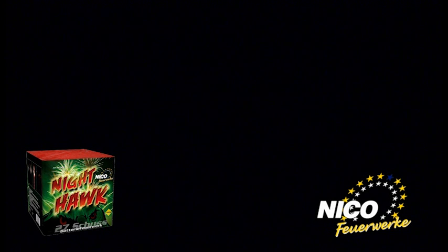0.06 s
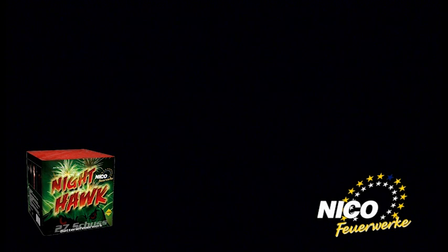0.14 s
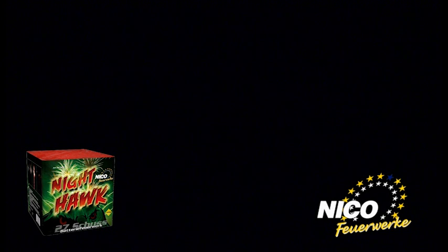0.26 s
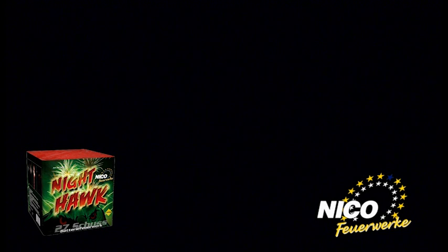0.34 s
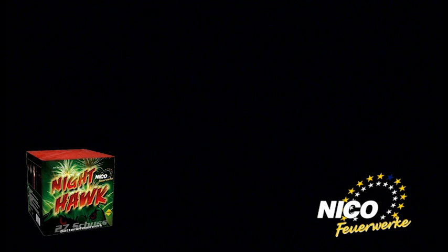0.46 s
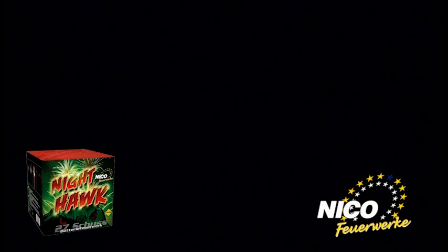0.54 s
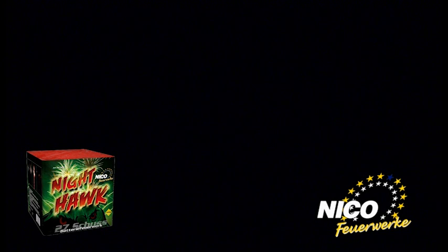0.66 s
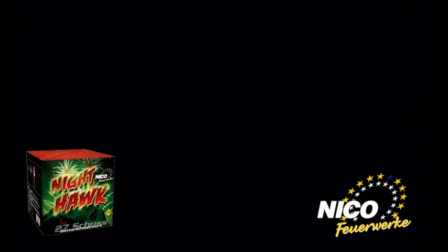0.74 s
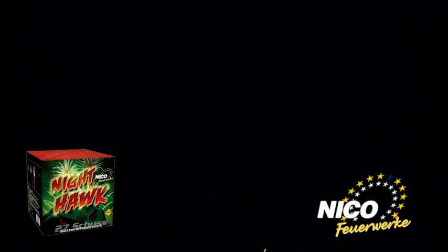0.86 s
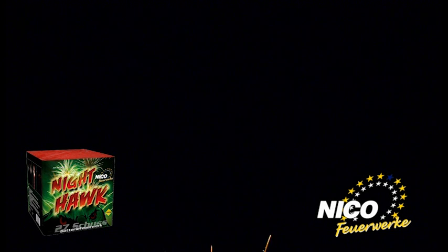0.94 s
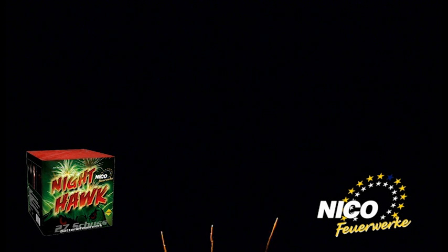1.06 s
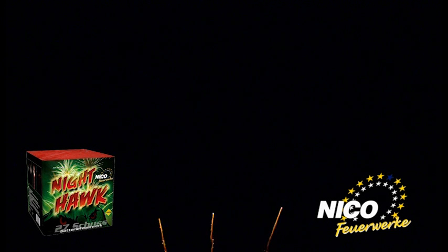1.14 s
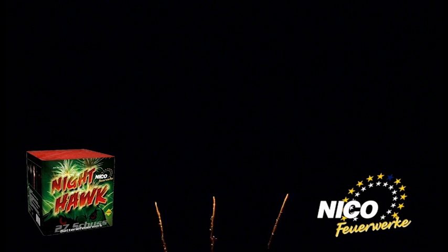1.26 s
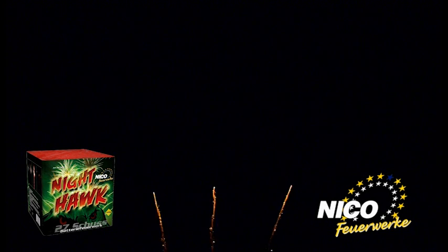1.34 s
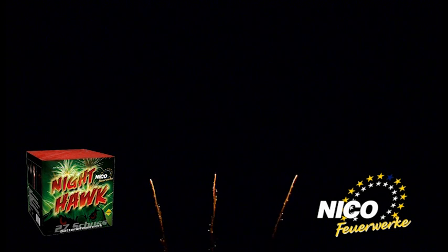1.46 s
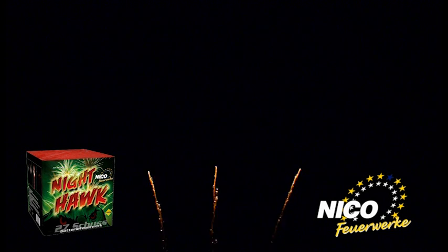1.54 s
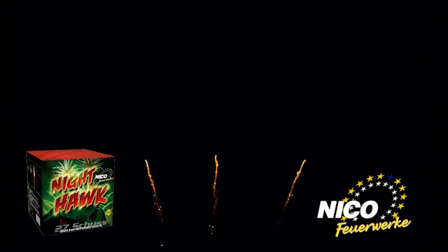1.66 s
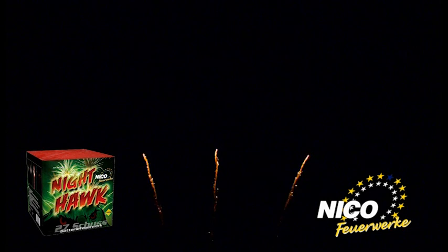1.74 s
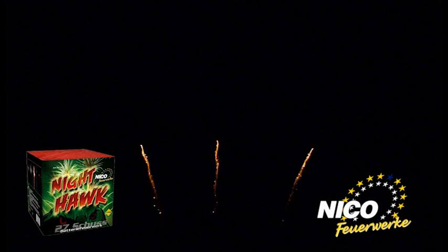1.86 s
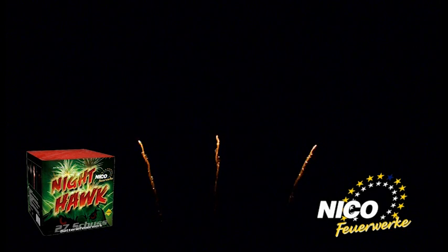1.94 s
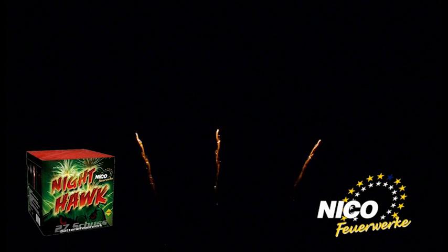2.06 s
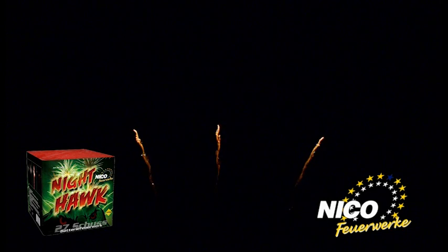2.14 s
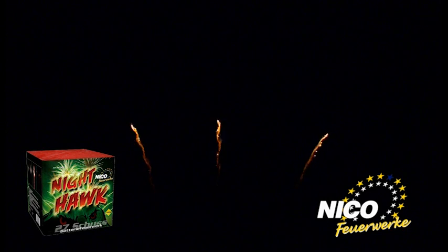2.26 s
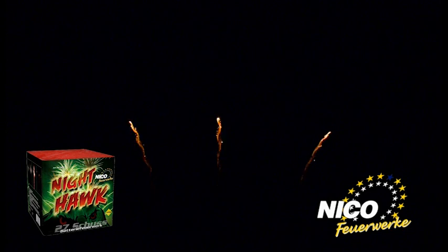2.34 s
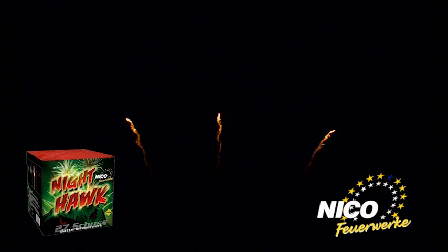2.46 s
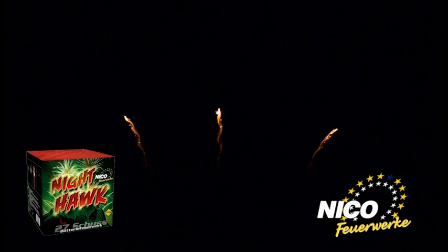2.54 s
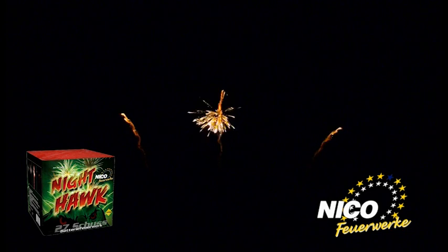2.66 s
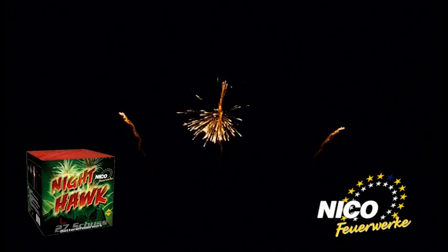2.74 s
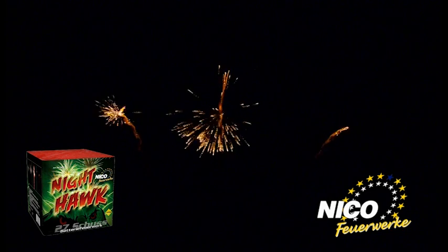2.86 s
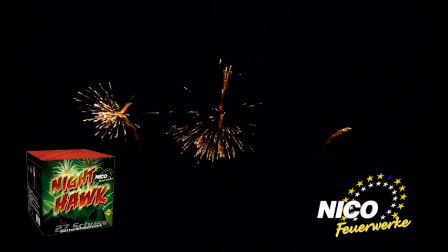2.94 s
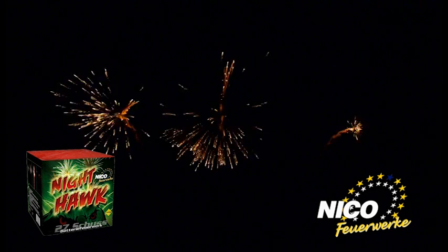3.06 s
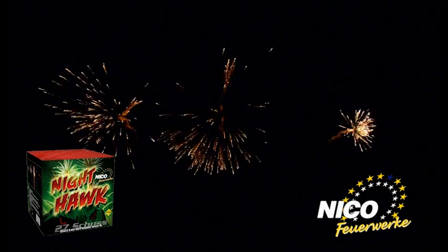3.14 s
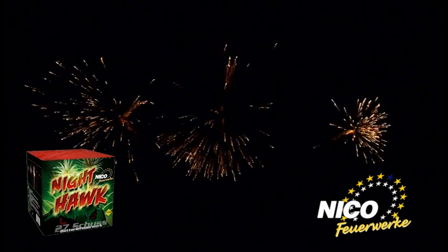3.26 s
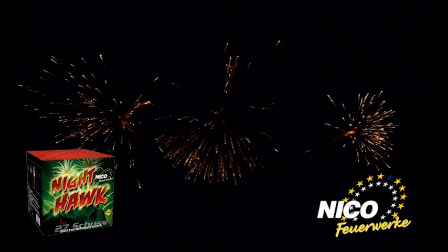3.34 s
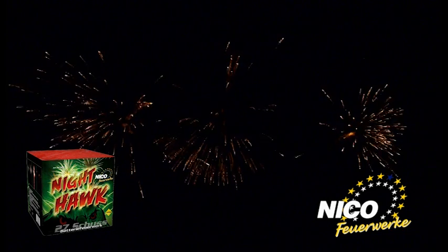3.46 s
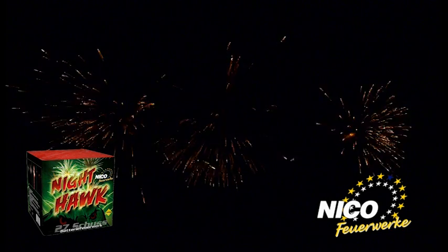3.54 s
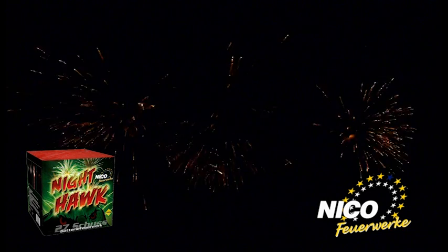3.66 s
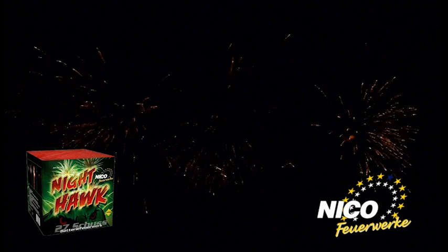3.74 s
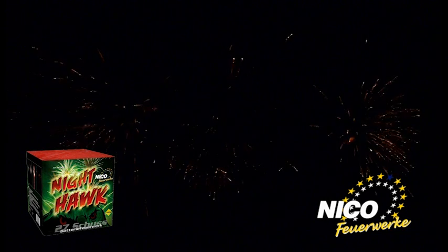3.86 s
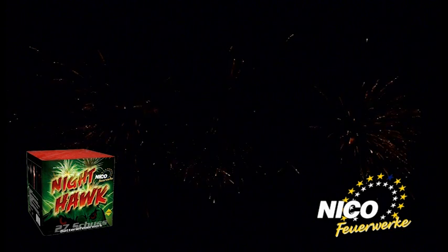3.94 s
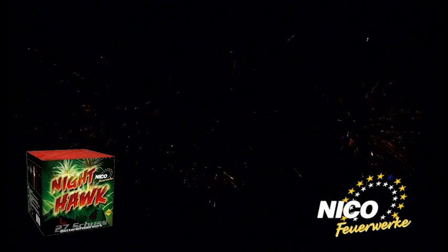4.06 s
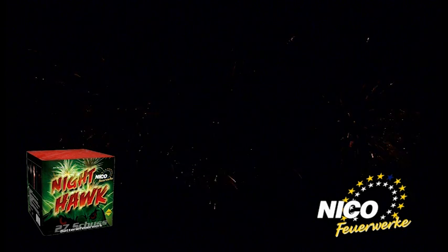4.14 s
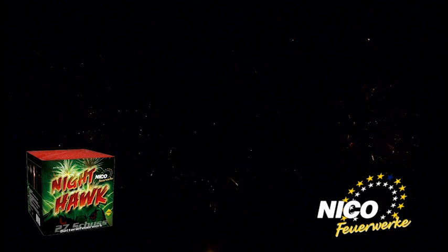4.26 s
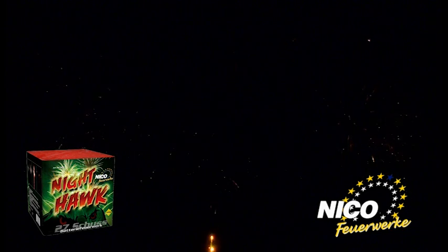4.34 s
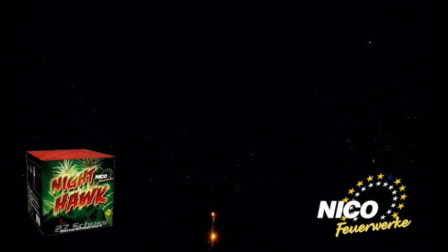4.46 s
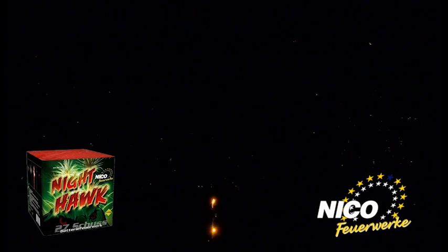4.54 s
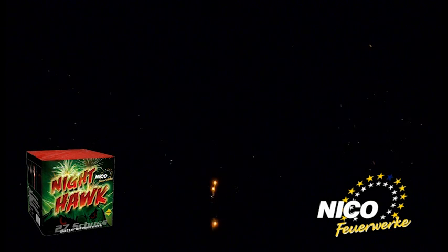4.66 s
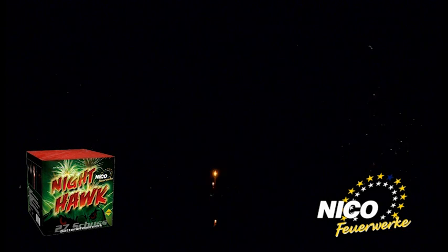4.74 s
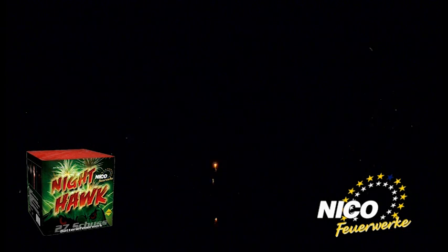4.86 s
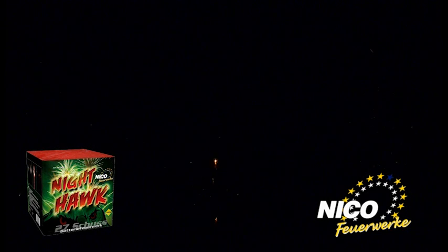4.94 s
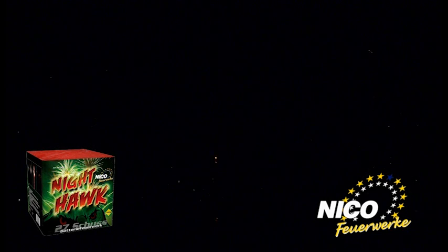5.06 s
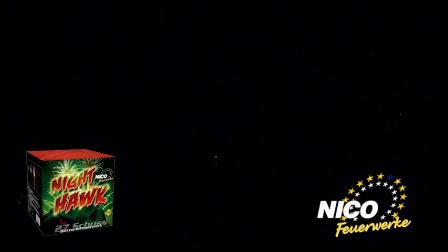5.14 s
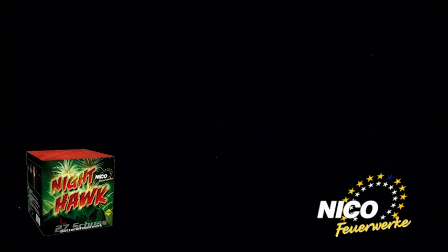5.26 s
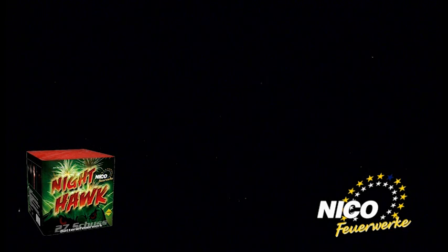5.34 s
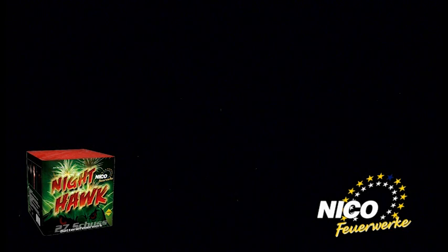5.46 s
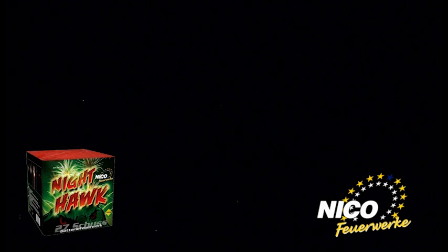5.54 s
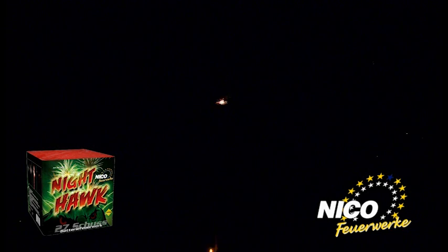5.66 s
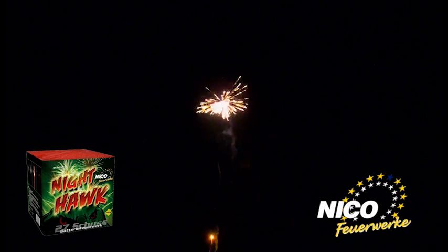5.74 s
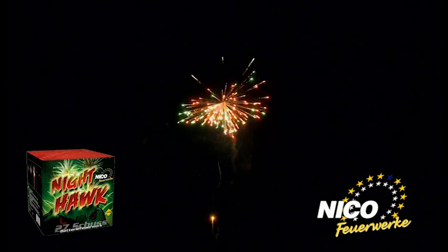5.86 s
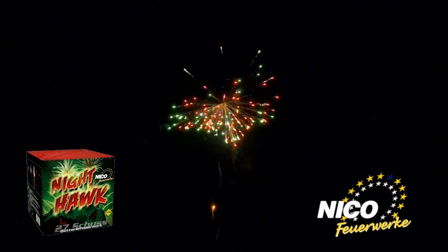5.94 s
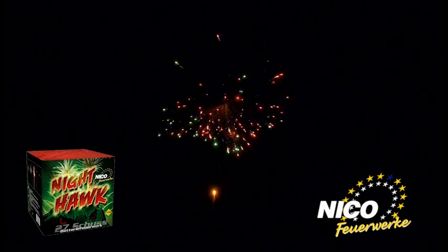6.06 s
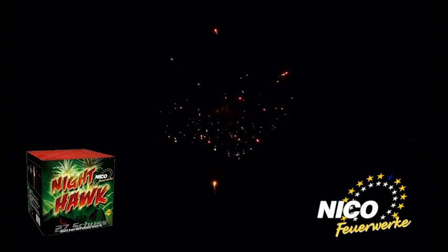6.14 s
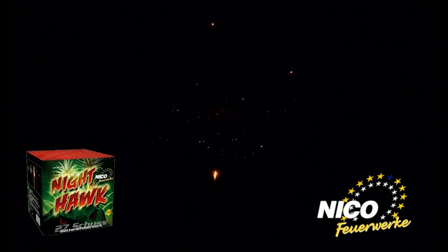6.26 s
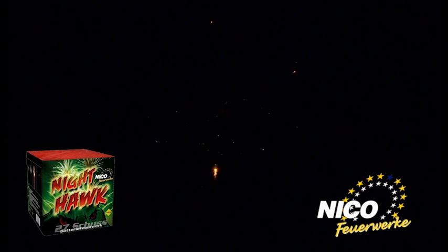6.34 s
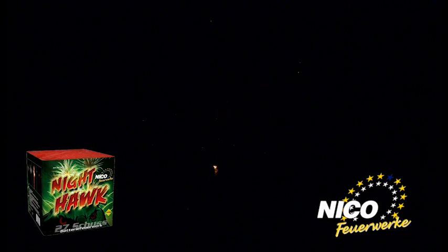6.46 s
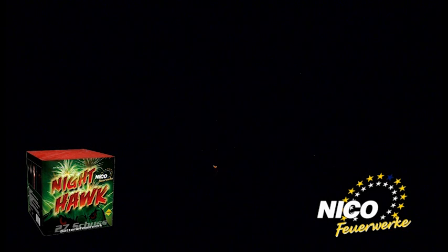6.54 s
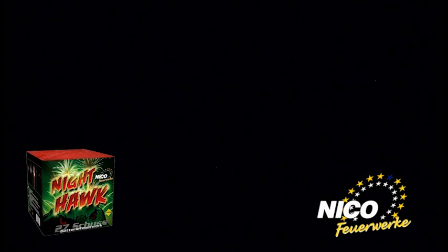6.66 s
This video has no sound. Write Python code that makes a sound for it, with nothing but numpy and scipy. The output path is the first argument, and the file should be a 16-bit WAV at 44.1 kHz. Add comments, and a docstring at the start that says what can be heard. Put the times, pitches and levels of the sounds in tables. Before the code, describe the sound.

A firework battery fires two loud thumps in quick succession outdoors, and comets hiss faintly as they climb. After a lull, three shells burst overhead with sharp bangs, the middle one loudest. Two more single launches follow, then a final burst. Nearby walls slap the launches back, and every shot returns from far away as a darkening hiss over a low rumble. The loudest shots slightly overload the microphone.

```python
"""Two quick thumps open a firework show at night, followed by bursts overhead and more launches.
Each shot is a blast of gas: a sharp snap, a crack and a low thump that drops in pitch.
Comets hiss faintly as they climb. Nearby walls slap each launch back, and the ground echoes
each burst. The far surroundings return every shot as a hiss that darkens as it dies, over a low
rolling rumble. The loudest shots overload the microphone."""
import sys
import numpy as np
from scipy import signal
from scipy.fft import irfft
from scipy.io import wavfile
from scipy.ndimage import uniform_filter1d

SR = 44100
rng = np.random.default_rng(int(sys.argv[2]) if len(sys.argv) > 2 else 0)


def write(x):
    x = np.atleast_2d(x).T
    wavfile.write(sys.argv[1], SR, np.round(np.clip(x, -1, 1) * 32767).astype(np.int16))


N = 295470
FRAME, HOP = 512, 128  # slice length and step, in samples, for shaping noise
HZ = np.fft.rfftfreq(FRAME, 1 / SR)
TIMES = np.arange(N // HOP + 5)[:, None] * HOP / SR
BASS_FOLLOW = 0.5  # dB of extra bass echo for each dB of a shot's echo_db

# Tubes firing. A thump's pitch halves after sag_s; bounce_s is the gap between copies of the snap.
# start_s, thump_db, pitch_hz, swell_s, sag_s, shock_db, bounce_s, crack_db, echo_db
LAUNCH_SHOTS = [(0.2978, -1.5, 280, .0022, 0.019, -11, .0067, -20, 6),
                (0.371, 1.5, 260, 0.0029, .14, 3.5, 0.0036, -13.5, 4.5),
                (3.819, 1, 304, 0.0027, 0.025, -15, 0.001, -10.5, 2),
                (5.0876, -1, 310, 0.0023, 0.017, -14, 0.00082, -19.5, 0)]
# Shells bursting: the same columns, then ground_spread_s, far_delay_s
BURST_SHOTS = [(2.7359, -15.5, 230, 0.00257, 0.16, -14, 0.00063, -21.5, 6.5, 0.061, 0.22),
               (2.9971, -1.5, 253, 0.0023, 0.18, -1, 0.00092, -11, 2.5, .05, 0.3433),
               (3.245, -9.5, 381.7, 0.0043, 0.0045, -2.5, 0.000728, -14, -0.5, 0.022, .16),
               (5.849, -9, 269, 0.0021, 0.027, -7, 0.00046, -18.5, 1, 0.04, 0.23)]
# Weak echoes after each shot: delay_s, level_db, spread_s, dull_above_hz
LAUNCH_SLAPS = [(.003, -27, 0.0045, 2330), (.057, -37.5, 0.011, 9000), (.078, -28.5, 0.0033, 1692),
                (.165, -46, .028, 1970), (.207, -48.5, 0.006, 8000), (0.5206, -41, .0044, 1750),
                (.549, -49, .006, 1720)]
BURST_SLAPS = [(.003, -35, 0.0076, 1000), (0.159, -44, 0.017, 1543)]
# Low thuds from farther walls: delay_s, level_db
LAUNCH_WALL_THUDS = [(0.0607, -18.5), (.241, -29.5), (0.391, -33), (.437, -26), (0.579, -28.5)]
BURST_WALL_THUDS = [(0.067, -23), (0.102, -39), (.186, -32.5)]
# Sharp echoes from the faces of the near wall: delay_s, level_db
WALL_KNOCKS = [(.0532, -7.5), (.0546, -8.5), (.0574, 2), (.0599, -12.5)]
# Small ticks between the shots: start_s, level_db
FAINT_TICKS = [(0.064, -48.5), (0.1327, -57), (1.8752, -56.5), (2.178, -54), (2.331, -63.5), (2.481, -61)]

# Tone of the direct sound, with dips where the ground bounce cancels it: frequency_hz, relative_db
LAUNCH_TONE = [(60, 2.5), (120, 3), (250, -3), (380, 3.5), (480, -0.5), (700, -6), (1000, 0), (1800, 0),
               (2600, 0), (6000, -1.5), (9000, -8.5), (14000, 2)]
BURST_TONE = [(60, 4), (110, 8.5), (200, 2.5), (520, 4), (700, 1.5), (1300, 5), (2050, -1), (2700, 6.5),
              (4800, -1), (6300, 2.5), (9000, -0.5), (14000, 4)]
# How each sound shares its strength from bass to treble: frequency_hz, relative_db
CRACK_TONE = [(150, -25), (500, 12.5), (1000, 0), (1600, -2.5), (2200, -7.5), (3000, -14), (4600, -12.5),
              (6200, -7.5), (8200, -14.5), (14000, -34)]  # a shot's crack
SLAP_TONE = [(80, -30), (300, 5.5), (600, 0), (1500, -2.5), (2300, -5.5), (3300, -4), (4700, -11.5),
             (6100, -7), (8500, -34.5), (14000, -45)]  # wall echoes
GROUND_TONE = [(80, -25), (300, 6.5), (700, 4.5), (1500, -4.5), (2500, -2.5), (4000, -8), (6200, -8),
               (8500, -26.5), (14000, -39)]  # a burst's ground echo
SCATTER_TONE = [(80, -4.5), (300, 10.5), (700, -3), (1500, -25), (3000, -13), (4700, -15.5), (6400, -15),
                (8500, -28), (14000, -39.5)]  # the tail from things close by
SWISH_TONE = [(1000, -22), (2500, -4), (4000, 1), (6000, -1), (8200, -16.5), (14000, -48)]  # the bright start of a distant echo
FAR_TONE = [(150, -51), (400, 6), (800, 3), (1500, -1.5), (2800, -6), (4500, -11.5), (6200, -12.5),
            (8500, -25.5), (14000, -58.5)]  # the distant echo's hiss
RUMBLE_TONE = [(25, -51.5), (55, -29.5), (100, -3.5), (200, 1.5), (330, -3.5), (480, -9.5), (800, -18),
               (2000, -51.5)]  # the broad rumble of bursts
ROLL_TONE = [(25, -49.5), (55, -22), (100, -10), (160, -3), (240, 3.5), (330, 1), (460, -14.5), (800, -36),
             (2000, -49.5)]  # the narrower rumble of launches
COMET_TONE = [(500, -25.5), (1400, 3.5), (2500, 1), (4500, -4), (7000, -2.5), (9000, -17), (14000, -22)]  # climbing comets
TICK_TONE = [(800, -9), (2000, -12), (2800, -1), (4000, 0), (6000, -5), (9000, -23)]  # dry ticks
NIGHT_TONE = [(20, -34), (45, -19.5), (80, 2), (160, 3), (320, -5.5), (550, -16), (1000, -19.5),
              (2200, -26), (5000, -30.5), (9000, -32), (13300, -32.5), (14000, -51)]  # the open air


def launches():
    """The tubes fire; each shot's echo_db drives its near tail, distant hiss and rumble."""
    starts, *_, echo_db = np.transpose(LAUNCH_SHOTS)
    far_starts, far_db = starts + 0.29, 1.08 * echo_db
    out = shots(LAUNCH_SHOTS, LAUNCH_TONE, LAUNCH_SLAPS, LAUNCH_WALL_THUDS, thud_gain_db=-2.5,
                shock_s=0.00063, bounce_gain=0.65, crack_s=0.0014, boom_db=-27.5, boom_hz=141)
    out += near_tail(starts, echo_db - 38, fade_60db_s=0.77, air_db_per_khz_s=0)
    out += far_hiss(far_starts, far_db - 40, rise_s=0.44, fade_db_per_s=32, air_loss=1.0)
    out += swishes(far_starts + 0.015, far_db - 60.5, spread_s=0.039)
    return out + rumble(starts, BASS_FOLLOW * echo_db - 48, hold_s=0.62, fade_db_per_s=23, tone=ROLL_TONE)


def bursts():
    """Shells break overhead; from that height all reach the far surroundings equally strongly."""
    starts, *_, echo_db, _, far_delay_s = np.transpose(BURST_SHOTS)
    out = shots(BURST_SHOTS, BURST_TONE, BURST_SLAPS, BURST_WALL_THUDS, thud_gain_db=-3.5,
                shock_s=0.0004, bounce_gain=0.8, crack_s=0.0013, boom_db=-20, boom_hz=109)
    out += near_tail(starts, echo_db - 39.5, fade_60db_s=1.36, air_db_per_khz_s=0.5)
    out += far_hiss(starts + far_delay_s, levels_db=-37.5, rise_s=0.13, fade_db_per_s=26.5, air_loss=0.5)
    out += swishes(starts + far_delay_s, levels_db=-49.5, spread_s=0.042)
    return out + rumble(starts, levels_db=-40.5, hold_s=0.044, fade_db_per_s=12.5)


def shots(rows, tone, slaps, thuds, thud_gain_db, shock_s, bounce_gain, crack_s, boom_db, boom_hz):
    """Each blast makes a thump, a boom, a crack and a snap, then comes back as slaps and thuds."""
    direct, echoes = np.zeros(N), np.zeros(N)
    snap = shock_wave(shock_s, front_s=0.00005)
    boom = -thump(boom_hz, swell_s=0.0071, sag_s=0.045)  # a slower, deeper swing that follows each blast
    for start_s, thump_db, pitch_hz, swell_s, sag_s, shock_db, bounce_s, crack_db, echo_db, *_ in rows:
        add(direct, start_s, amp(thump_db) * thump(pitch_hz, swell_s, sag_s))
        add(direct, start_s, amp(thump_db + boom_db) * boom)
        add(direct, start_s, amp(crack_db) * puff(CRACK_TONE, crack_s))
        for bounce in range(3):  # the snap arrives directly and by two short detours
            add(direct, start_s + bounce * bounce_s, amp(shock_db) * bounce_gain ** bounce * snap)
        for delay_s, level_db, spread_s, dull_above_hz in slaps:
            slap = puff(SLAP_TONE, spread_s, dull_above_hz, grit_db=7)
            add(echoes, start_s + delay_s, amp(echo_db + level_db) * slap)
        for delay_s, level_db in thuds:
            thud = thump(280 * rng.uniform(0.84, 0.92), swell_s=0.0032, sag_s=0.046)
            add(echoes, start_s + delay_s, amp(thud_gain_db + BASS_FOLLOW * echo_db + level_db) * thud)
    return tint(direct, tone) + echoes


def thump(pitch_hz, swell_s, sag_s):
    """Air pressure swings a few times after a blast, each swing slower than the last."""
    t = np.arange(8192) / SR
    cycles = pitch_hz * sag_s * np.log1p(t / sag_s)
    swell = (t / swell_s * np.exp(1 - t / swell_s)) ** 2.36
    return -swell * np.sin(2 * np.pi * cycles)


def shock_wave(push_s, front_s):
    """The snap: a sudden push of air followed by a longer, weaker pull."""
    t = np.arange(2048) / SR
    front = 1 - np.exp(-(t / front_s) ** 2)
    return (1 - t / push_s) * np.exp(-t / push_s) * front


def wall_echo():
    """The near wall answers every launch alike: knocks from its faces, grit from its rough parts."""
    echo, out = np.zeros(SR // 2), np.zeros(N)
    cut_treble = signal.butter(4, 6800, fs=SR)
    knock = signal.lfilter(*cut_treble, shock_wave(push_s=0.00018, front_s=0.00006))
    for delay_s, level_db in WALL_KNOCKS:
        add(echo, delay_s, amp(level_db) * knock)
    add(echo, 0.053, amp(-22.5) * puff(SLAP_TONE, spread_s=0.0038, grit_db=2.5))
    for start_s, *_ in LAUNCH_SHOTS:
        add(out, start_s, echo)
    return out


def ground_echo(peak_delay_s=0.061):
    """The ground throws each burst back as a gritty puff, weaker the longer it spreads."""
    out = np.zeros(N)
    for start_s, *_, spread_s, _ in BURST_SHOTS:
        level_db = -35 - 3 * np.log10(spread_s / 0.01)
        echo = puff(GROUND_TONE, spread_s, grit_db=5.5, steepness=3.7)
        add(out, start_s + peak_delay_s - spread_s, amp(level_db) * echo)
    return out


def near_tail(starts, levels_db, fade_60db_s, air_db_per_khz_s):
    """The ground and things close by scatter each shot into a short tail of noise."""
    fade_db_per_s = 60 / fade_60db_s + air_db_per_khz_s * HZ / 1000
    strength = tails(starts, levels_db, fade_db_per_s, rise_s=0.0039)
    return shaped_noise(strength * colour(SCATTER_TONE, HZ) * flutter(1.4, slices=7, bands=30))


def swishes(starts, levels_db, spread_s):
    """The nearest of the distant surfaces answer first, with treble only."""
    out = np.zeros(N)
    for start_s, level_db in np.broadcast(starts, levels_db):
        add(out, start_s, amp(level_db) * puff(SWISH_TONE, spread_s, grit_db=5, samples=20000))
    return out


def far_hiss(starts, levels_db, rise_s, fade_db_per_s, air_loss):
    """The distant echo: treble swells first, then the air soaks it up as the paths grow longer."""
    khz = np.maximum(HZ, HZ[1]) / 1000  # rise_s holds at 1 kHz; higher bands rise faster
    strength = tails(starts, levels_db, fade_db_per_s + air_loss * khz ** 2.06, rise_s / khz ** 0.31)
    return shaped_noise(strength * colour(FAR_TONE, HZ) * flutter(2.6, slices=10, bands=12))


def rumble(starts, levels_db, hold_s, fade_db_per_s, tone=RUMBLE_TONE):
    """Bass rolls round the landscape in lumps, holding for a moment before it fades."""
    strength = tails(starts, levels_db, fade_db_per_s, rise_s=0.01, hold_s=hold_s)
    lumpy_noise = shaped_noise(strength * flutter(1.5, slices=9, bands=4))
    return tint(lumpy_noise, tone, samples=4096)


def comets(rise_s=0.12, fade_db_per_s2=3.5):
    """Comets light with the first launch; their faint hiss fades ever faster as they climb."""
    age_s = np.maximum(TIMES - LAUNCH_SHOTS[0][0], 0)
    strength = amp(-64.5 - fade_db_per_s2 * age_s ** 2) * (1 - np.exp(-age_s / rise_s))
    return shaped_noise(strength * colour(COMET_TONE, HZ) * flutter(1.8, slices=120, bands=7))


def ticks():
    """Faint dry ticks, each a tiny puff of noise."""
    out = np.zeros(N)
    for start_s, level_db in FAINT_TICKS:
        add(out, start_s, amp(level_db) * puff(TICK_TONE, spread_s=0.000784))
    return out


def night_air():
    """The steady low drone of the open air, with a trace of hiss."""
    return amp(-58) * tint(rng.standard_normal(N), NIGHT_TONE, samples=4096)


def puff(tone, spread_s, dull_above_hz=0.45 * SR, grit_db=0, steepness=1, samples=12000):
    """A swarm of tiny, uneven clicks that swells for spread_s and then dies away."""
    progress = np.arange(samples) / SR / spread_s
    swell = (progress * np.exp(1 - progress)) ** steepness
    hiss, sizes = rng.standard_normal((2, samples))
    grit = np.repeat(np.clip(sizes, -2, 2), 8)[:samples]  # a new size every 8 samples
    swarm = swell * hiss * amp(grit_db * grit)
    swarm *= np.linalg.norm(swell) / np.linalg.norm(swarm)  # grit adds no energy
    cut_treble = signal.butter(2, dull_above_hz, fs=SR)
    return signal.lfilter(*cut_treble, tint(swarm, tone))


def tails(starts, levels_db, fade_db_per_s, rise_s, hold_s=0):
    """The combined strength of overlapping echoes that each rise, hold and fade."""
    power = 0
    for start_s, level_db in np.broadcast(starts, levels_db):
        age_s = np.maximum(TIMES - start_s, 0)
        loss_db = fade_db_per_s * np.maximum(age_s - hold_s, 0)
        rise = 1 - np.exp(-age_s / rise_s)
        power = power + (amp(level_db - loss_db) * rise) ** 2
    return np.sqrt(power)


def flutter(depth_db, slices, bands):
    """Random louder and softer patches, sized in time slices and frequency bands."""
    patches = rng.standard_normal((len(TIMES), len(HZ)))
    patches = uniform_filter1d(patches, slices, axis=0)
    patches = uniform_filter1d(patches, bands, axis=1)
    return amp(depth_db * patches / patches.std())


def shaped_noise(strength):
    """Noise that follows a map of strength over time and frequency."""
    white = rng.standard_normal(len(TIMES) * HOP)
    _, _, spectrum = signal.stft(white, nperseg=FRAME, noverlap=FRAME - HOP)
    shaped = spectrum[:, :len(TIMES)] * strength.T
    return signal.istft(shaped, nperseg=FRAME, noverlap=FRAME - HOP)[1][:N]


def tint(sound, tone, samples=1024):
    """Filters a sound by a tone table without moving it in time."""
    gain = colour(tone, np.fft.rfftfreq(samples, 1 / SR))
    kernel = np.fft.fftshift(irfft(gain)) * signal.get_window("hann", samples)
    return signal.oaconvolve(sound, kernel[1:], "same")


def colour(tone, hz):
    """Turns a tone table into a gain at each frequency; white noise keeps its power."""
    frequency_hz, relative_db = np.transpose(tone)
    gain = amp(np.interp(np.log(hz + 1), np.log(frequency_hz), relative_db))
    return gain / np.sqrt(np.mean(gain ** 2))


def amp(db):
    """Turns decibels into a gain to multiply by."""
    return 10 ** (np.asarray(db) / 20)


def add(mix, start_s, sound):
    """Mixes a sound in at start_s."""
    part = mix[round(start_s * SR):][:len(sound)]
    part += sound[:len(part)]


def scene():
    """Launches, bursts, their echoes and the night air, in one channel."""
    opening_rumble = rumble([-1], levels_db=-47, hold_s=0.35, fade_db_per_s=11.5)  # already fading
    fireworks = launches() + bursts() + wall_echo() + ground_echo()
    return (fireworks + opening_rumble + comets() + ticks() + night_air())[None]


def record(dry, ceiling=0.998, low_hz=35, top_hz=15100):
    """The microphone thins the deep bass, rounds off loud peaks and loses the highest treble."""
    thin = signal.lfilter(*signal.butter(1, low_hz, "high", fs=SR), dry)
    rounded = ceiling * np.tanh(thin / ceiling)
    rounded = signal.lfilter(*signal.butter(4, 36, "high", fs=SR), rounded)
    cut_treble = signal.firwin(511, top_hz, window=("kaiser", 9), fs=SR)
    return signal.oaconvolve(rounded, cut_treble[None], "same")


dry = scene()
out = record(dry)
write(out)
```